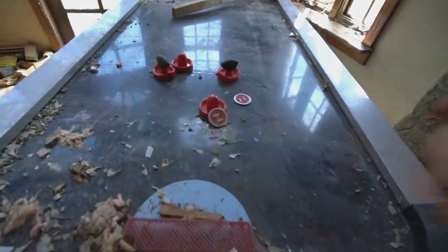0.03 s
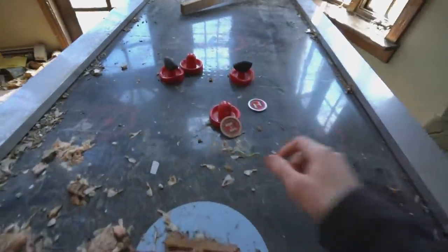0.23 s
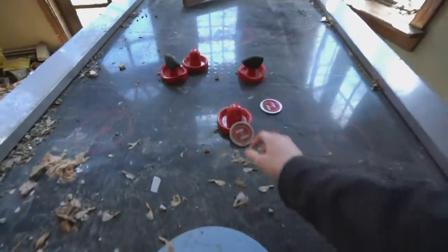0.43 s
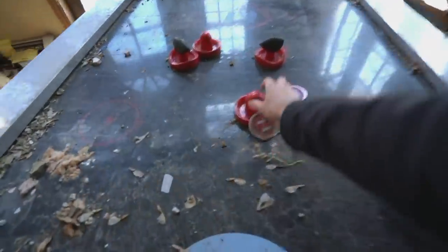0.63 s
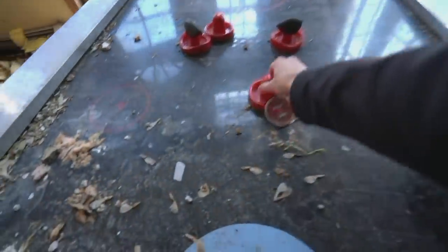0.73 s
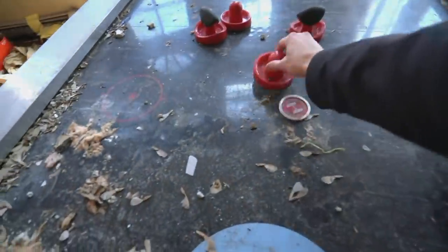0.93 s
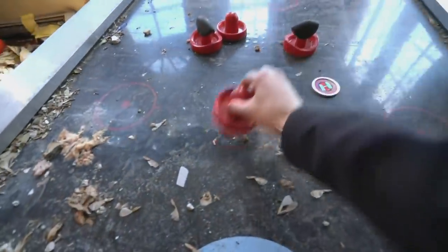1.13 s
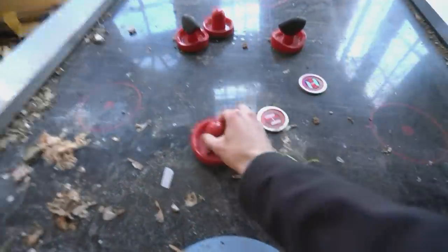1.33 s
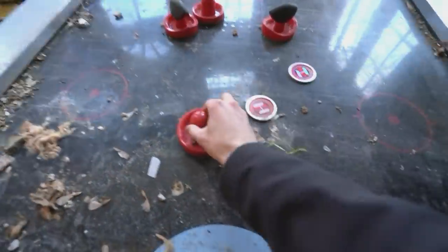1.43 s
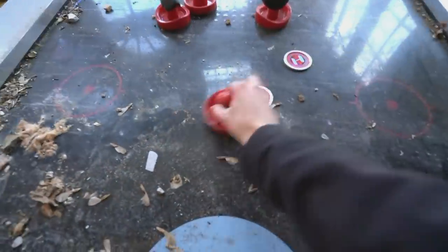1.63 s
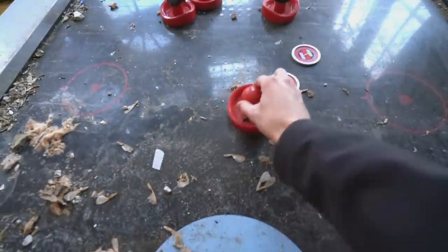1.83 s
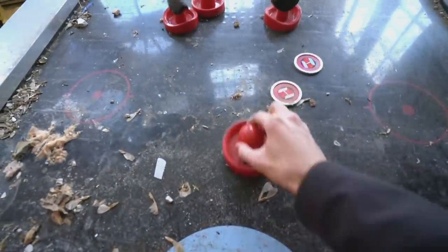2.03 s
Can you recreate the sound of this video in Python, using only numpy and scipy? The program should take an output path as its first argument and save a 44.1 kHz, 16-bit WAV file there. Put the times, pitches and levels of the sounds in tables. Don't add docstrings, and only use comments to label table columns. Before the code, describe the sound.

A plastic mallet is handled on a gritty game table, close in stereo: faint cloth rustle, crisp puck click, rapid loose knocks, near quiet, then a brief juddering scrape with a low table thump, in an empty hard-walled room.

```python
import sys
import numpy as np
from scipy import signal
from scipy.fft import rfft, irfft
from scipy.io import wavfile
from scipy.ndimage import uniform_filter1d

SR = 44100
rng = np.random.default_rng(int(sys.argv[2]) if len(sys.argv) > 2 else 0)


def decibels_to_gain(level_db):
    exponent = np.asarray(level_db, float) / 20
    return 10 ** exponent


def dump(signal):
    limited = np.clip(np.atleast_2d(signal).T, -1, 1)
    pcm = np.round(limited * 32767).astype(np.int16)
    wavfile.write(sys.argv[1], SR, pcm)


N = 91595
T = np.arange(N) / SR

# [f/Hz, level/dB, t60/s]
MALLET_MODES = [(476, 4.5, 0.023), (572, 8.5, 0.011), (719, -1.5, 0.04), (820, -7, 0.05), (895, 1.5, 0.038),
                (998, 3, 0.018), (1168, 4, 0.014), (1406, -0.5, 0.018), (1580, 1, 0.015),
                (2220, 4.5, 0.0057), (3000, -41, 0.024), (4070, -30, 0.017), (5070, -16, .02),
                (6250, -10, .02)]
# [f/Hz, level/dB, t60/s]
CUP_MODES = [(831, 2, 0.026), (1010, -13, 0.033), (600, -25, 0.012), (1577, -11, 0.044),
             (2433, -20.5, 0.066), (3580, -28, 0.04)]
# [f/Hz, level/dB, t60/s]
TABLE_MODES = [(61, -45, 0.16), (100, -4.5, 0.18), (117.9, -2, 0.15), (200.2, -7, 0.1), (244, -6, .08),
               (284, 0, 0.094), (339, -2.5, 0.1), (385, -10, 0.22), (487, -11.5, 0.062),
               (590, -16.5, 0.035)]


def unit(x):
    return x / np.sqrt(np.mean(x ** 2))


def butter(x, order, hz, kind="low"):
    return signal.sosfilt(signal.butter(order, hz, kind, fs=SR, output="sos"), x)


def ring(x, modes, gains=None):
    if gains is None:
        gains = np.ones(len(modes))
    out = 0
    for k, (hz, db, t60) in enumerate(modes):
        pole = np.exp(2j * np.pi * hz / SR - np.log(1000) / (t60 * SR))
        sign = (-1) ** k
        out = out + decibels_to_gain(db) * gains[k] * sign * signal.lfilter([1], [1, -pole], x).imag
    return out


def colour(x, spectrum):
    points = np.array(spectrum)
    f = np.arange(N // 2 + 1) * SR / N + 1
    gain_db = np.interp(np.log(f), np.log(points[:, 0]), points[:, 1], left=-70)
    return unit(irfft(rfft(x) * decibels_to_gain(gain_db), N))


def curve(rows, column=1):
    r = np.array(rows)
    return decibels_to_gain(np.interp(T, r[:, 0], r[:, column], left=-120, right=-120))


def walk(rate_hz):
    k = int(SR / rate_hz)
    steps = np.repeat(rng.standard_normal(N // k + 1), k)
    return unit(uniform_filter1d(steps, k)[:N])


def add(out, s, db, x):
    i = int(s * SR)
    out[i:i + len(x)] += (decibels_to_gain(db) * x / np.abs(x).max())[:N - i]


def push(contact_s, length=12000):
    force = np.zeros(length)
    n = max(int(contact_s * SR), 1)
    force[:n] = np.hanning(n + 2)[1:-1]
    return force


def crack(hz, decay_s):
    burst = rng.standard_normal(4000) * np.exp(-T[:4000] / decay_s)
    return butter(burst, 2, [hz / 3.05, min(hz * 1.21, 18000)], "bandpass")


def wide(mid, side):
    s = butter(side, 1, 1650, "high")
    return np.array([mid + s, mid - s])


def bounce(x):
    ir = rng.standard_normal(600) * np.exp(-T[:600] / 0.0031)
    ir = butter(ir / np.sqrt(np.sum(ir ** 2)), 1, 900, "high")
    return wide(x, decibels_to_gain(-1.5) * signal.fftconvolve(x, ir)[:N])


def air():
    # [f/Hz, level/dB]
    air_spectrum = [(15, -39), (36, 4), (58, 6.5), (126, 1.5), (200, -4.5), (392, -3), (1430, -7.5),
                    (2200, -17.5), (15800, -30)]
    level_db, flicker_db = -53.5, 0.6
    n = [colour(rng.standard_normal(N), air_spectrum) for _ in range(2)]
    bass_difference = 0.051 * n[1] * np.array([[1], [-1]])
    return decibels_to_gain(level_db + flicker_db * walk(4)) * (wide(n[0], 0.99 * n[1]) + bass_difference)


def sleeve():
    # [t/s, level/dB]
    sleeve_levels = [
        (0, -62),
        (.12, -65),
        (0.2, -57),
        (.45, -53),
        (.72, -56),
        (0.946, -55.5),
        (1.34, -67.5),
        (1.5, -78),
    ]
    # [f/Hz, level/dB]
    cloth_spectrum = [(120, -13), (200, -9.5), (437, -7.5), (525, -9.5), (1090, -12), (1710, -13.5),
                      (3010, -20.5), (5300, -17), (15500, -29.5)]
    flicker_db = 0.6
    n = [colour(rng.standard_normal(N) + 0.18 * grit(), cloth_spectrum) for _ in range(2)]
    return curve(sleeve_levels) * decibels_to_gain(4.5 + flicker_db * walk(25.5)) * wide(n[0], 1.02 * n[1])


def table_thumps():
    # [t/s, level/dB, contact/s]
    thumps = [(0.1256, -40, 0.0012), (.198, -44, 0.0022), (.21, -43.5, 0.0043), (0.359, -42.5, 0.00052),
              (0.775, -40, 0.006), (0.806, -36.5, 0.0015), (0.862, -59, 0.0077), (1.372, -37.5, 0.0094),
              (1.382, -37.5, 0.011), (1.583, -36.5, 0.012), (1.662, -28, 0.0059), (1.707, -26.5, 0.008),
              (1.722, -26, 0.0017), (1.742, -17, 0.0014), (1.754, -18, 0.0012), (1.776, -27, 0.0062),
              (1.837, -35, 0.002), (1.851, -37, .002)]
    out = np.zeros(N)
    for s, db, contact_s in thumps:
        add(out, s, db, ring(push(contact_s), TABLE_MODES))
    return out


def lone_grains():
    # [t/s, level/dB, centre f/Hz, decay/s]
    grains = [(0.138, -59, 2560, 0.0035), (0.143, -47, 7050, 0.0081), (.285, -44, 12000, .003),
              (0.784, -34, 10500, 0.0043), (0.795, -34, 7200, 0.0017), (0.816, -42, 2200, 0.0016),
              (1.198, -41.5, 3000, 0.0048), (1.377, -43.5, 3000, 0.0088), (1.436, -50.5, 6940, 0.0012),
              (1.581, -35.5, 1900, 0.0068), (1.653, -36, 2200, .002), (1.6709, -24, 1850, 0.002),
              (1.7041, -23, 4730, 0.0028), (1.713, -35, 1900, .002), (1.736, -41, 3000, 0.0011),
              (1.759, -28, 2160, 0.0019), (1.7823, -35, 2630, 0.00069), (1.855, -40.5, 3000, .001)]
    out = np.zeros(N)
    for s, db, hz, decay_s in grains:
        add(out, s, db, crack(hz, decay_s))
    return out


def grit(per_s=5500):
    chance, sign, size = rng.random((N, 3)).T
    scatter_db = 2
    heights = decibels_to_gain(-scatter_db * np.log(size + 0.002))
    return unit((chance < per_s / SR) * np.sign(sign - 0.5) * heights)


def drag():
    # [t/s, sliding speed level/dB, pressure level/dB]
    drag_motion = [
        (1.574, -104, -67),
        (1.585, -58, -45),
        (1.63, -54.5, -53),
        (1.68, -50.5, -34),
        (1.73, -49.5, -26.5),
        (1.78, -52, -37.5),
        (1.83, -55, -39.5),
        (1.88, -64.5, -42),
        (1.92, -90, -75),
    ]
    # [t/s, level/dB]
    scuff_motion = [
        [(.128, -71), (.14, -55), (.19, -63), (.23, -91)],
        [(.76, -107), (.79, -59.5), (.83, -56.5), (.92, -59.5)],
        [(1.06, -66), (1.1, -87), (1.22, -63.5), (1.3, -72.5)],
    ]
    # [f/Hz, level/dB]
    grit_spectrum = [(88, -43), (150, 9), (279, 0.5), (643, -28), (827, -14), (1400, -0.5), (1600, -7.5),
                     (9000, -14), (15500, -23.5)]
    # [f/Hz, level/dB, t60/s]
    rim_modes = [(1600, -1, 0.032), (1910, 8.5, 0.0083), (2435, -2.5, .04), (3040, -3.5, 0.04),
                 (3540, -2.5, 0.039), (4490, -22, 0.036), (4760, -21.5, 0.018)]
    rim_db, rim_clicks_per_s, patchy_db = -5.5, 500, 1.2
    scuffs = sum(curve(c) for c in scuff_motion)
    speed = curve(drag_motion) + scuffs
    press = curve(drag_motion, column=2) + decibels_to_gain(10) * scuffs

    clicks = grit()
    body = unit(ring(clicks, TABLE_MODES))
    body = body + decibels_to_gain(-34) * unit(ring(clicks, CUP_MODES))
    body = body + decibels_to_gain(-6) * unit(ring(clicks, MALLET_MODES[:7]))

    hiss = wide(colour(clicks, grit_spectrum), 0.72 * colour(grit(), grit_spectrum))
    rim = bounce(unit(ring(grit(rim_clicks_per_s), rim_modes)))
    hiss = (hiss + decibels_to_gain(rim_db) * rim) * decibels_to_gain(patchy_db * walk(59.9))
    low = butter(hiss, 2, 5000)
    fast = np.where(T > drag_motion[0][0], (speed / speed.max()) ** 0.6, 1)
    return uniform_filter1d(press, 300) * body + speed * decibels_to_gain(10.5) * (low + fast * (hiss - low))


def chatter(length_s, hz):
    jolt, jitter = 0.7, 0.015
    wander = uniform_filter1d(rng.standard_normal(12000), 60) * 8
    step = hz * (1 + jitter * wander) / SR
    saw = uniform_filter1d(np.cumsum(step) % 1 - 0.5, 9)
    return jolt * push(0.00069) + push(length_s) ** 0.5 * saw


def cup_slips():
    # [t/s, length/s, level/dB, f/Hz]
    slips = [(0.172, 0.0098, -42, 880), (1.58, 0.010, -29, 927), (1.588, 0.012, -16, 847),
             (1.601, 0.009, -21, 907), (1.608, 0.0068, -18, 870), (1.614, 0.014, -23, 862),
             (1.631, 0.0092, -29, 1040), (1.638, 0.007, -22, 816), (1.656, 0.0083, -21.5, 907),
             (1.6702, 0.0054, -13.5, 841), (1.675, 0.0052, -20, 814), (1.680, 0.0095, -15.5, 827),
             (1.686, 0.0098, -21.5, 843), (1.692, 0.01, -16, 832), (1.724, 0.004, -33, 840),
             (1.747, 0.01, -20, 827), (1.757, 0.0072, -28, 868)]
    out = np.zeros(N)
    for s, length_s, db, hz in slips:
        add(out, s, db, ring(chatter(length_s, hz), CUP_MODES))
    return out


def mallet_knocks():
    # [t/s, level/dB, favoured f/Hz, crack level/dB, table level/dB]
    knocks = [(.138, -43, 804, -44, -53), (.166, -44, 400, -48, -50), (.183, -54, 500, -53, -56),
              (0.9302, -17.5, 1220, -28.5, -33), (0.9324, -14, 520, -21, -30), (0.948, -24, 1300, -36, -32),
              (0.966, -29, 560, -42, -31.5), (1.0034, -17, 1020, -23.5, -26.5),
              (1.0067, -17.5, 895, -32, -31), (1.013, -19.5, 694, -38, -56), (1.023, -21, 726, -55, -56),
              (1.05, -27.5, 900, -51, -60), (1.0602, -16, 1430, -26, -28), (1.063, -13, 790, -51, -32),
              (1.071, -20.5, 610, -38, -55), (1.0765, -21, 900, -54, -44), (1.096, -19.5, 900, -48, -38.5),
              (1.103, -25, 900, -50, -29.5), (1.126, -26, 900, -51, -34.5), (1.135, -30, 710, -56, -38.5),
              (1.644, -22, 560, -45, -60), (1.721, -16.5, 690, -44, -55)]
    favour_octaves = 0.58
    out = np.zeros(N)
    for s, db, hz, crack_db, table_db in knocks:
        off = np.log2(np.array(MALLET_MODES)[:, 0] / hz) / favour_octaves
        add(out, s, db, ring(push(0.00035), MALLET_MODES, 1 / (1 + off ** 2)))
        add(out, s, crack_db, crack(4900, 0.0033))
        add(out, s, db - 19.5, crack(1900, 0.048))
        add(out, s, table_db, ring(push(0.0006), TABLE_MODES))
    return out


def rattle():
    decay_s = 0.014
    return push(0.0001) + 0.04 * rng.standard_normal(12000) * np.exp(-T[:12000] / decay_s)


def puck_ticks():
    # [f/Hz, level/dB, t60/s]
    puck_modes = [(1561, -2, 0.06), (815, -15, 0.06), (1584, -4, 0.07), (2240, -12, 0.012),
                  (2830, -2, 0.014), (3220, -10, 0.025), (2895, -9, 0.05), (3450, -12, .02),
                  (4610, -11, 0.018), (5400, -14, 0.02), (5900, -9, 0.016), (6580, -14, 0.02),
                  (8690, -26, 0.028)]
    # [t/s, level/dB, bending mode level/dB]
    ticks = [
        (0.8286, -13, -25),
        (0.8389, -21.5, -4),
        (0.8497, -28, -24),
        (0.858, -27, -27),
        (0.867, -26, -29),
        (0.9338, -32, -23),
        (1.008, -31, -36),
        (1.06, -32, -27),
    ]
    bending = np.array(puck_modes)[:, 0] < 8000
    out = np.zeros(N)
    for s, db, bend_db in ticks:
        gains_db = rng.standard_normal(len(puck_modes)) + bend_db * bending
        add(out, s, db, ring(rattle(), puck_modes, decibels_to_gain(gains_db)))
        add(out, s, db - 5, crack(4000, 0.002))
        add(out, s, db - 6.5 + bend_db / 2, crack(5000, 0.022))
    return out


def room(x):
    early_t60_s, late_t60_s, late_db = 0.27, 0.79, -7
    t = T[:SR]
    decay = decibels_to_gain(-60 * t / early_t60_s) + decibels_to_gain(late_db - 60 * t / late_t60_s)
    ir = rng.standard_normal((3, SR)) * decay * np.clip(t / 0.0036, 0, 1)
    low = butter(ir, 2, 2120)
    ir = butter(low + decibels_to_gain(-5.5) * (ir - low), 2, 170, "high")
    ir = wide(ir[0], ir[1]) + 0.36 * ir[2] * np.array([[1], [-1]])
    ir = ir / np.sqrt(np.sum(ir[0] ** 2))
    return decibels_to_gain(-8.5) * signal.fftconvolve(x[None], ir, axes=1)[:, :N]


def ports(x):
    bass_left_db, treble_right_db, lead_rad = 1.5, 4.5, 0.21
    f = np.arange(N // 2 + 1) * SR / N
    side = np.array([[0.5], [-0.5]])
    high = f ** 2 / (f ** 2 + 640 ** 2)
    db = bass_left_db * (1 - high) - treble_right_db * high
    lead = np.exp(1j * side * lead_rad / (1 + (f / 900) ** 2))
    return irfft(rfft(x) * decibels_to_gain(side * db) * lead, N)


def scene():
    hits = table_thumps() + lone_grains() + cup_slips() + mallet_knocks() + puck_ticks()
    near = bounce(hits) + drag()
    return ports(near + room(near.mean(axis=0)) + sleeve()) + air()


def roll_off(x):
    return signal.sosfilt(signal.butter(12, 16070, fs=SR, output="sos"), x)


def record(dry):
    low_pass = signal.ellip(10, 0.2, 70, 15750, fs=SR, output="sos")
    mix = signal.sosfilt(low_pass, dry)
    return roll_off(mix)


dry = scene()
out = record(dry)
dump(out)
```